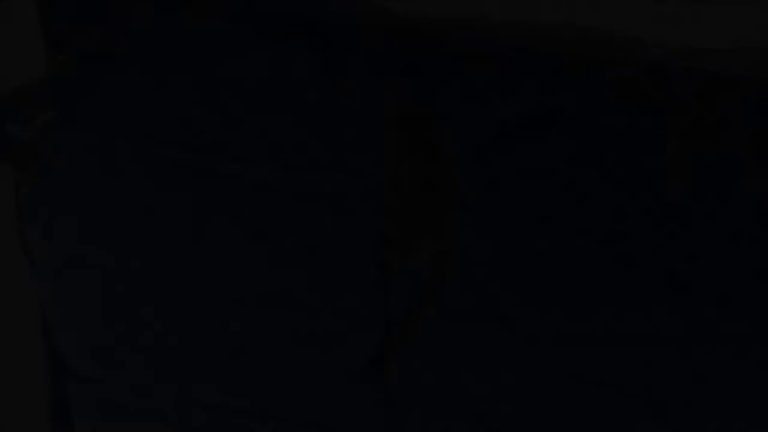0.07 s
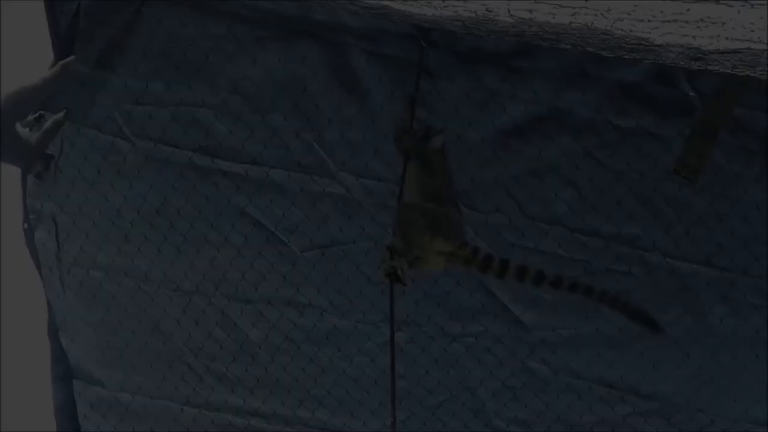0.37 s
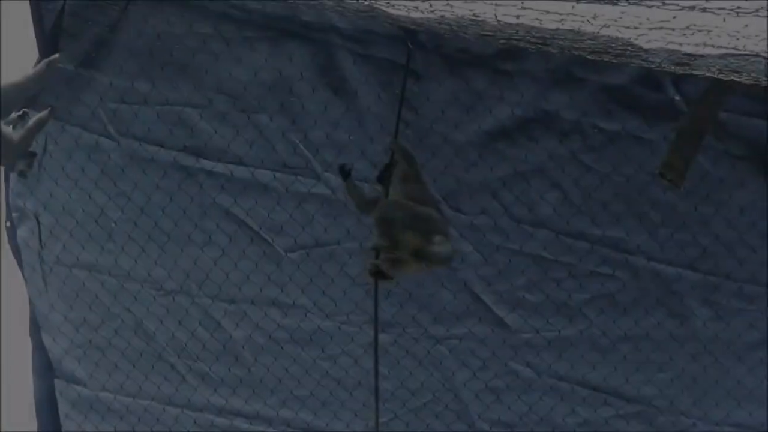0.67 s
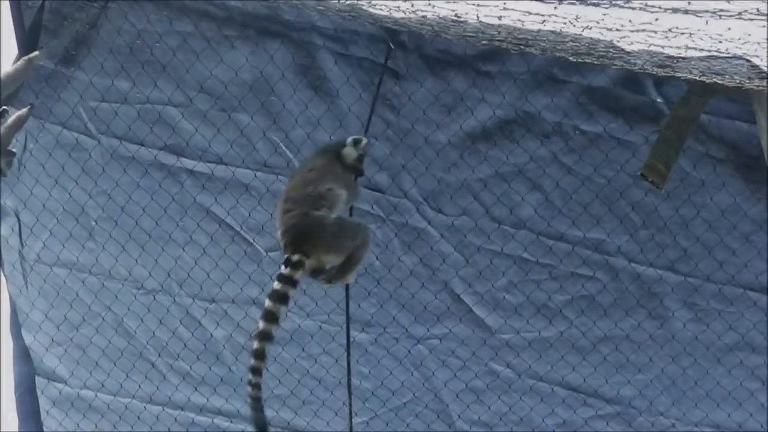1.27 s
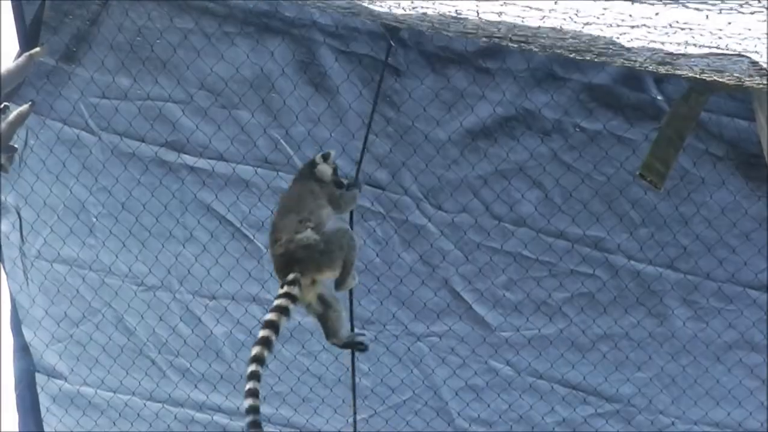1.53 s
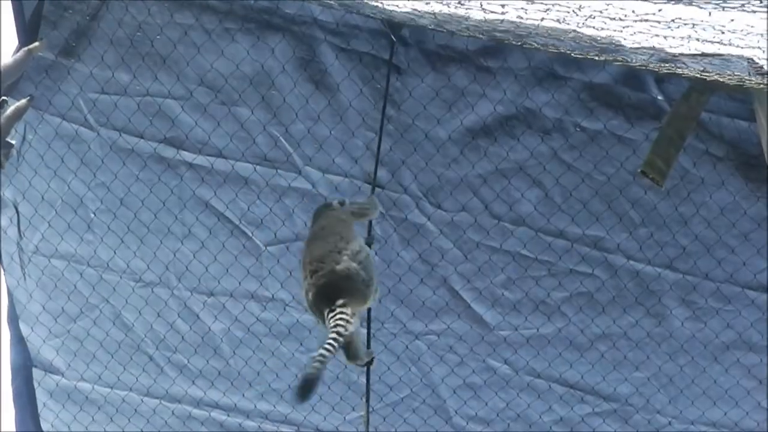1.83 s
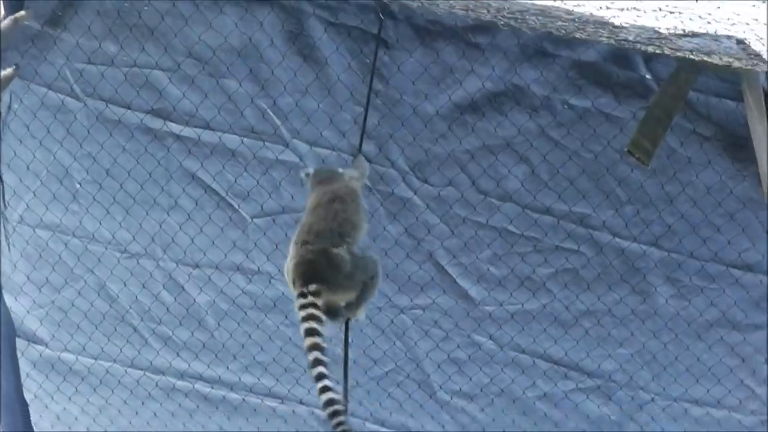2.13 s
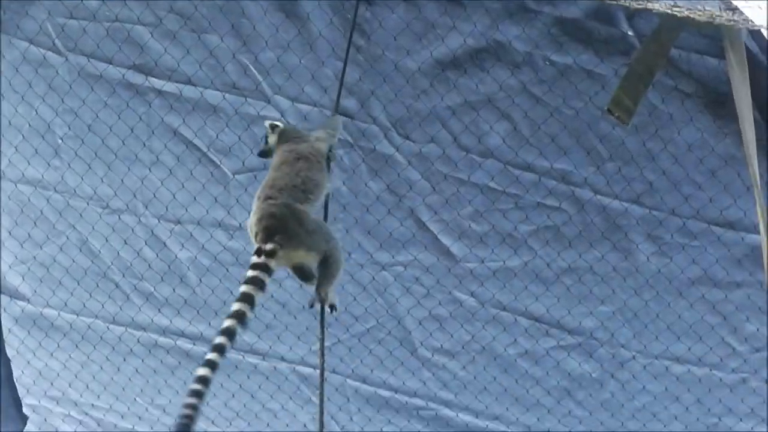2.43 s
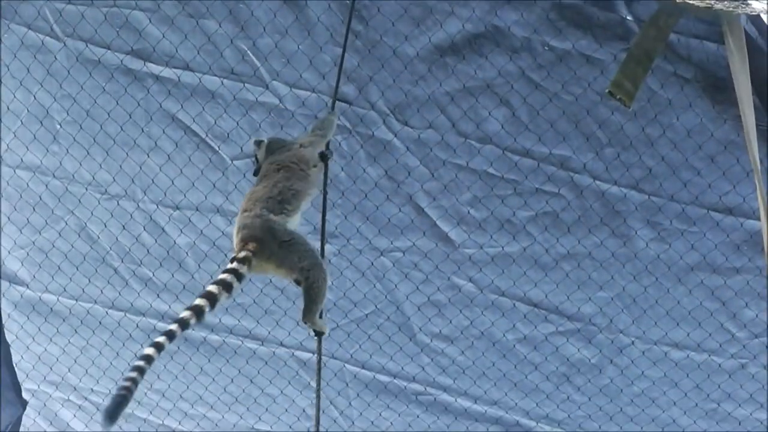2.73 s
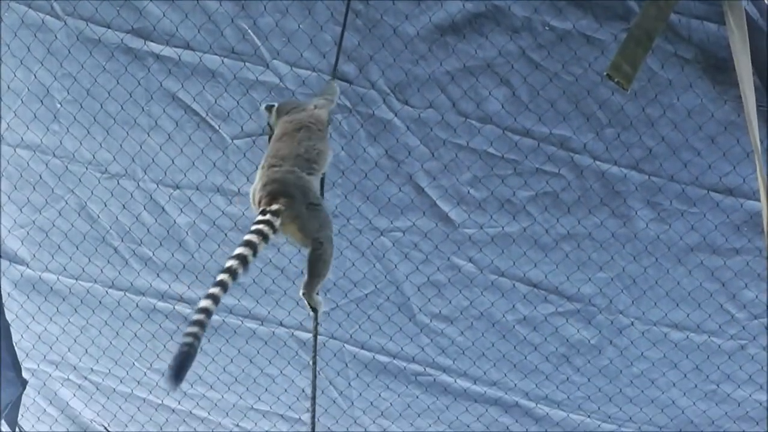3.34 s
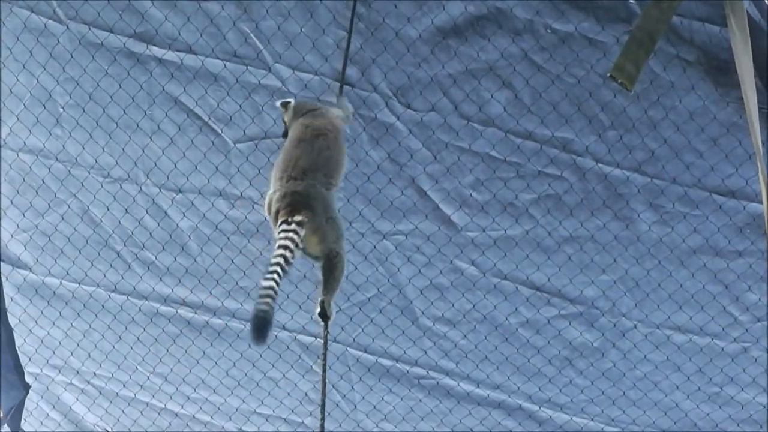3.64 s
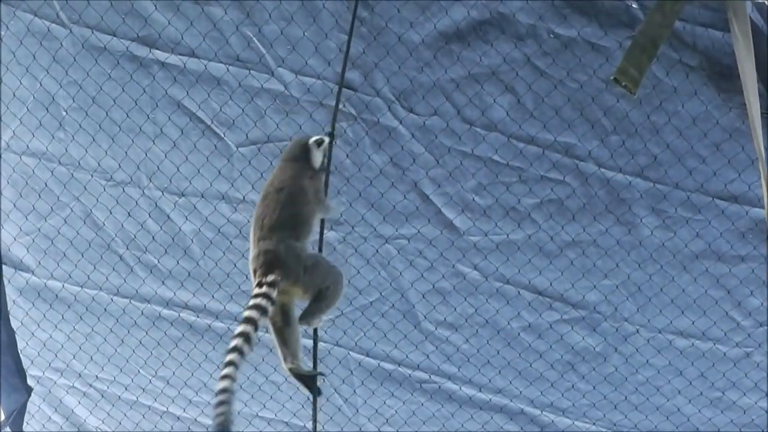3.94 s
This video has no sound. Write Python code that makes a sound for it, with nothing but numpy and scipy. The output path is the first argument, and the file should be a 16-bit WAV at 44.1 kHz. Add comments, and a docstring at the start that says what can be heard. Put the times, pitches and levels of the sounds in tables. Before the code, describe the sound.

The low rumble and broad airy rush of a ventilation fan fill an animal enclosure. A quieter, high cicada buzz pulses and gradually swells, and a soft hoot sounds twice, with two faint, distant chirps in the second half.

```python
"""A low rumble and a broad rush of air come from a ventilation fan by an animal enclosure.
Its turbulent flow gives broadband noise; its shaft and motor add a hum of steady tones.
Above it a high, throbbing hiss, probably cicadas, slowly swells while its resonance sinks in pitch.
Twice a faint hooting tone rises out of the rush, and two far chirps sound within the hiss."""
import sys
import numpy as np
from scipy import signal
from scipy.fft import rfft, irfft
from scipy.io import wavfile

SR = 44100
rng = np.random.default_rng(int(sys.argv[2]) if len(sys.argv) > 2 else 0)


def waveform_to_disk(signal):
    """Save audio, clipped to [-1, 1], as 16-bit WAV at the path in sys.argv[1]."""
    frames = np.transpose(np.atleast_2d(signal))
    scaled = np.clip(frames, -1, 1) * 32767
    samples = np.round(scaled).astype(np.int16)
    wavfile.write(sys.argv[1], SR, samples)


N = 176400
T = np.arange(N) / SR
BINS = np.maximum(np.arange(N // 2 + 1) * SR / N, 1)  # Hz

# Far chirps. Each row: middle in seconds, time to fall to 1/e in seconds, pitch in Hz, level in dB.
FAR_CHIRPS = [(2.19, 0.16, 4150, -47), (3.645, .04, 8900, -43)]
# Spectrum of the insect chorus. Each row: frequency in Hz, relative density in dB.
CHORUS_SPECTRUM = [(2200, -20.5), (2800, -12), (3250, -14.5), (3650, -9.5), (3950, -3), (4500, -2.5),
                   (5400, 1.5), (7000, 0), (8100, -1), (9600, -5.5), (10600, -15), (12600, -18),
                   (14000, -27), (15500, -40)]
# Swell of the chorus. Each row: time in seconds, level in dB.
CHORUS_SWELL = [(.1, -41), (1.1, -38.5), (2.2, -37), (3.0, -36.5), (4, -35.5)]
# Shrill core of the song. Each row: time in seconds, resonance in Hz, level in dB.
SHRILL_GLIDE = [(.1, 6938, -45.5), (1.0, 6910, -40), (1.9, 6735, -38.5), (2.7, 6434, -36),
                (3.3, 6398, -35.5), (4, 6237, -35.5)]
# Narrow notes in the song. Each row: frequency in Hz, level in dB relative to the core.
SHRILL_NOTES = [(3947, -24), (6266, -15), (6680, -16), (6817, -13), (6949, -15), (8014, -21)]
# Throb of the song. Each row: time in seconds, rate in beats per second.
THROB_TEMPO = [(0, 7.95), (2.0, 7.85), (2.4, 7.55), (4, 7.75)]
# Reflections from nearby walls. Each row: delay in seconds, gain in dB.
WALL_ECHOES = [(.0073, -14), (0.0122, -17), (.031, -13.5)]
# Likeness of left and right. Each row: frequency in Hz, correlation from -1 to 1.
INSECT_CORRELATION = [(3500, 0.79), (6500, 0.67), (9500, 0.7), (11000, .25), (12500, -.2), (15000, -.2)]
FAN_CORRELATION = [(25, .93), (70, 0.96), (700, 0.98), (1300, .94), (2400, 0.71), (6000, 1), (12000, -0.25)]
# Hoots. Each row: start in seconds, length in seconds, pitch in Hz, level in dB.
HOOT_NOTES = [(.03, 0.425, 585.6, -31), (2.324, 0.445, 594, -32)]
# Spectra of the fan housing and the rushing air. Each row: frequency in Hz, relative density in dB.
RUMBLE_SPECTRUM = [(12, -20), (22, -2), (40, -2.5), (60, 0), (95, 0.5), (135, -9), (190, -10.5),
                   (290, -6.5), (360, -14), (600, -16.5), (1500, -51.5)]
RUSH_SPECTRUM = [(200, -28), (400, -9), (510, -6), (620, -1), (760, -0.5), (1000, -3.5), (1200, -5.5),
                 (1420, -9.5), (1750, -17.5), (2050, -25), (2450, -36.5), (2850, -40), (3250, -43.5),
                 (6000, -40), (12000, -41), (15500, -58)]
# Slow surges of the rumble, the air and the duct boom. Each row: time in seconds, level in dB.
RUMBLE_SURGES = [(.1, -30.5), (.8, -29), (1.6, -29), (1.9, -30), (2.35, -28), (2.9, -29.5), (4, -29.5)]
RUSH_SURGES = [(.1, -24.5), (.65, -25), (1.1, -24), (1.4, -25), (2.05, -24), (2.2, -24.5), (2.4, -23.5),
               (2.85, -24.5), (3.1, -24.2), (3.42, -24), (3.96, -25)]
BOOM_SURGES = [(.1, -42.5), (.9, -41), (1.6, -49), (2.3, -40), (2.7, -40), (3.05, -33.5), (3.5, -32.5),
               (3.8, -46)]
# Hum of the shaft. Each row: multiple of the rotation rate, level in dB.
SHAFT_HARMONICS = [(5, -44), (6, -41.5), (7, -41), (8, -44.5), (9, -47), (10, -46.5), (15, -51.5)]
# Further steady hum tones: two lines from the motor and one near the 14th harmonic of the shaft. Each row:
# frequency in Hz, level in dB.
HUM_TONES = [(59.3, -40.5), (120, -43), (297, -48)]


def from_db(db):
    """Amplitude grows tenfold for every 20 dB."""
    return 10 ** (np.asarray(db) / 20)


def unit_rms(x):
    """Division by the rms gives a signal unit power."""
    return x / np.sqrt(np.mean(x ** 2) + 1e-20)


def in_time(rows):
    """Linear interpolation gives each column's value at every sample."""
    times, *columns = np.transpose(rows)
    return [np.interp(T, times, column) for column in columns]


def over_hz(rows):
    """Interpolation over log frequency gives a value at every bin."""
    hz, value = np.transpose(rows)
    return np.interp(np.log(BINS), np.log(hz), value)


def drift(corner_hz):
    """Low-pass filtering turns white noise into a slow fluctuation of unit rms."""
    white = rfft(rng.standard_normal(N)) * (BINS > 1)
    return unit_rms(irfft(white / (1 + (BINS / corner_hz) ** 2), N))


def stereo_noise(gain, correlation):
    """The balance of in-phase and antiphase noise sets the correlation of the two channels."""
    mid, side = rfft(rng.standard_normal((2, N)))
    alike = np.clip(over_hz(correlation), -.999, .999)
    spectrum = np.sqrt(1 + alike) * mid + np.sqrt(1 - alike) * side * [[1], [-1]]
    return unit_rms(irfft(gain * spectrum, N))


def resonant_noise(hz, width_hz):
    """A resonance passes noise near its centre; the width is taken 8.5 dB below the peak."""
    response = 1 / (1 + (2 * (BINS - hz) / width_hz) ** 2) ** 1.41
    return stereo_noise(response, INSECT_CORRELATION)


def tone(hz, wander, waver_db):
    """Random frequency and amplitude modulation make a sine waver; wander is a fraction of its pitch."""
    cycles = np.cumsum(hz * (1 + wander * drift(3.2))) / SR + rng.random()
    return unit_rms(np.sin(2 * np.pi * cycles) * from_db(waver_db * drift(4.5)))


def chirps():
    """Narrowband noise under a Gaussian envelope is heard as a brief, far chirp."""
    return sum(from_db(db) * np.exp(-((T - middle) / fade) ** 2) * resonant_noise(hz, width_hz=330)
               for middle, fade, hz, db in FAR_CHIRPS)


def wall_echoes(song):
    """Delayed reflections interfere with the direct sound, forming a comb filter."""
    response = 1 + sum(from_db(db) * np.exp(-2j * np.pi * BINS * delay) for delay, db in WALL_ECHOES)
    return irfft(rfft(song) * response, N)


def cicadas(first_beat_s=.095, chorus_throb_db=.7, shrill_throb_db=.8, waver_db=.3):
    """Shared amplitude modulation makes a broad chorus and a sinking resonance throb together."""
    rate, = in_time(THROB_TEMPO)
    beats = np.cumsum(rate) / SR - first_beat_s * rate[0]
    throb = np.cos(2 * np.pi * beats) * (1 + .3 * drift(2))  # beats of uneven depth
    chorus_db, = in_time(CHORUS_SWELL)
    chorus = stereo_noise(from_db(over_hz(CHORUS_SPECTRUM)), INSECT_CORRELATION)
    chorus *= from_db(chorus_db + chorus_throb_db * throb)
    core_hz, shrill_db = in_time(SHRILL_GLIDE)
    band = resonant_noise(core_hz.mean(), width_hz=2100)
    notes = sum(from_db(db) * resonant_noise(hz, width_hz=15) for hz, db in SHRILL_NOTES)
    glide = np.exp(2j * np.pi * np.cumsum(core_hz - core_hz.mean()) / SR)
    core = np.real(signal.hilbert(band) * glide)  # shifts the whole band in frequency
    shrill = (core + notes) * from_db(shrill_db + shrill_throb_db * throb)
    song = (chorus + shrill) * from_db(waver_db * drift(15))
    return wall_echoes(song) * from_db([[-.5], [.5]])  # slightly to the right


def hoots(edge_s=.051, lower_octave_db=-16.5, wander=.0049, waver_db=1):
    """An unsteady tone and its weak lower octave fuse into one soft hoot under a common envelope."""
    out = np.zeros(N)
    for start, length, hz, db in HOOT_NOTES:
        swell = np.clip(np.minimum(T - start, start + length - T) / edge_s, 0, 1)
        lower = from_db(lower_octave_db) * tone(hz / 2, wander, waver_db)
        out += from_db(db) * swell * (tone(hz, wander, waver_db) + lower)
    return out


def fan(shaft_hz=21.33, boom_hz=88.4, rumble_waver_db=1.25, rush_waver_db=.5):
    """Housing and turbulent air radiate continuous spectra; shaft, motor and duct add spectral lines."""
    rumble_db, = in_time(RUMBLE_SURGES)
    rumble = stereo_noise(from_db(over_hz(RUMBLE_SPECTRUM)), FAN_CORRELATION)
    rumble *= from_db(rumble_db + rumble_waver_db * drift(8))
    rush_db, = in_time(RUSH_SURGES)
    rush = stereo_noise(from_db(over_hz(RUSH_SPECTRUM)), FAN_CORRELATION)
    rush *= from_db(rush_db + rush_waver_db * drift(5.5))
    boom_db, = in_time(BOOM_SURGES)
    shaft = [(order * shaft_hz, db) for order, db in SHAFT_HARMONICS]
    lines = shaft + HUM_TONES + [(boom_hz, boom_db)]
    hum = sum(from_db(db) * tone(hz, wander=.0028, waver_db=2.5) for hz, db in lines)
    return (rumble + rush + hum) * from_db([[.33], [-.33]])  # slightly to the left


def scene():
    """By superposition, the pressures of the sources add."""
    return fan() + hoots() + cicadas() + chirps()


def record(dry, start_s=.096, cutoff_hz=15200):
    """A gate starts the sound abruptly, and a steep low-pass filter removes the highest treble."""
    low_pass = signal.ellip(10, .1, 80, cutoff_hz, fs=SR, output="sos")
    return signal.sosfilt(low_pass, dry * (T >= start_s))


dry = scene()
out = record(dry)
waveform_to_disk(out)
```